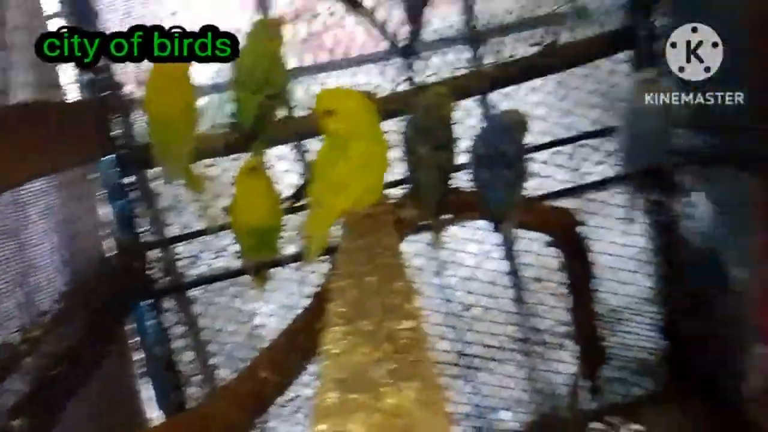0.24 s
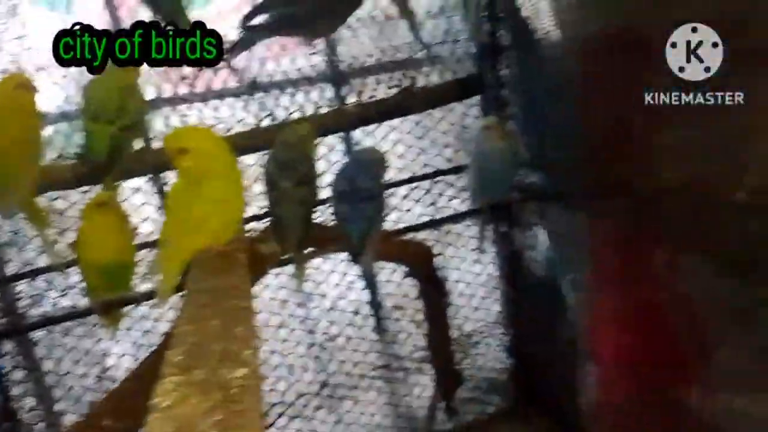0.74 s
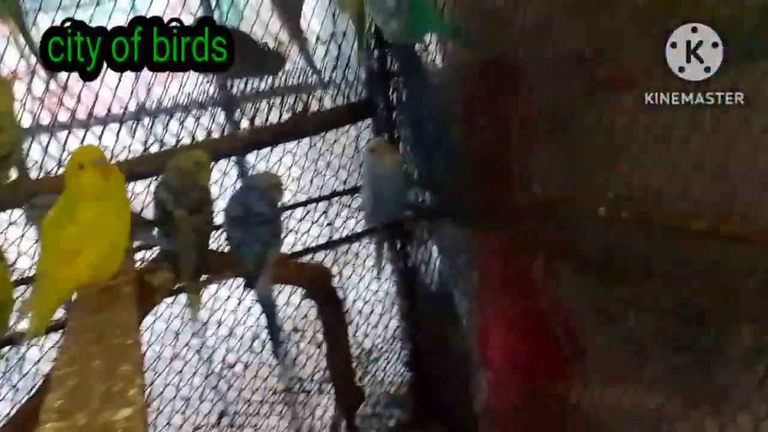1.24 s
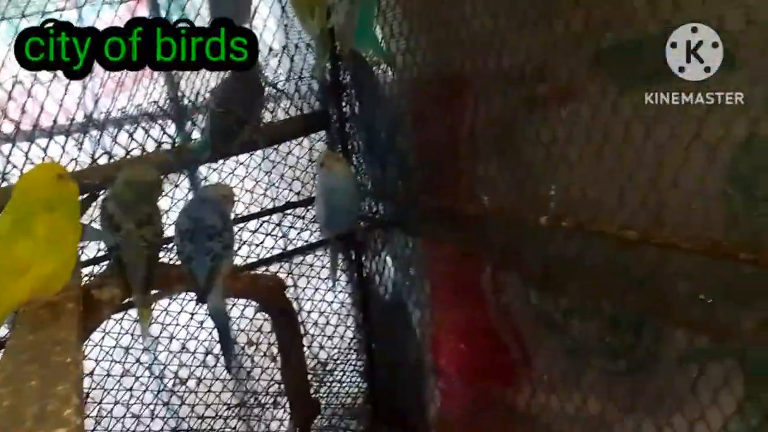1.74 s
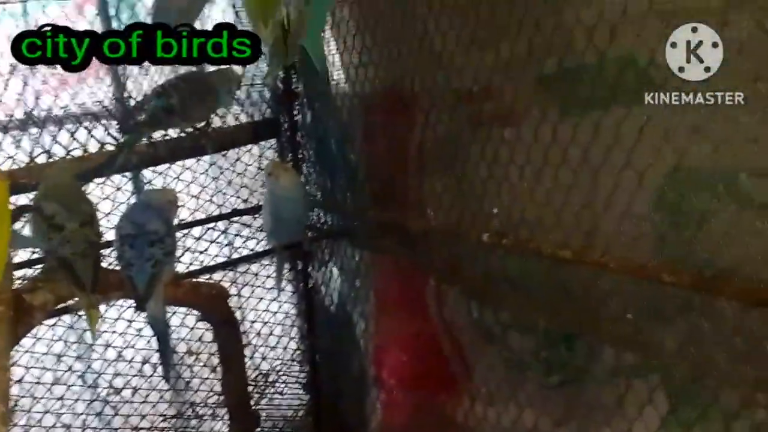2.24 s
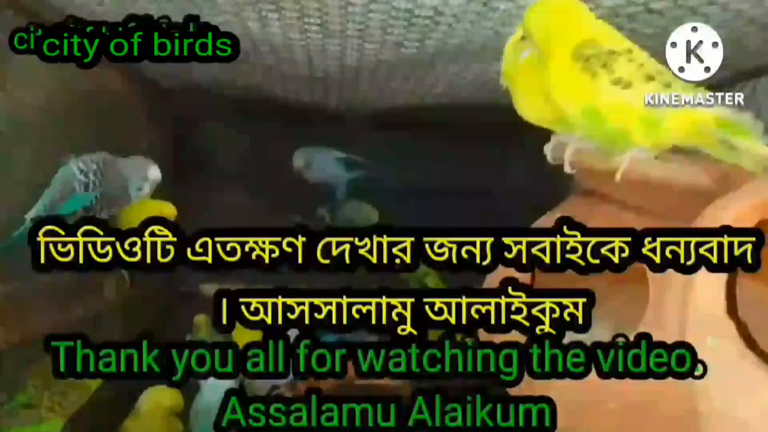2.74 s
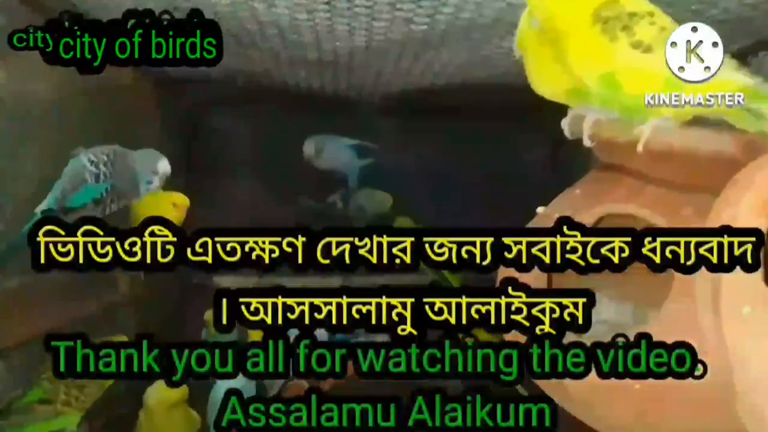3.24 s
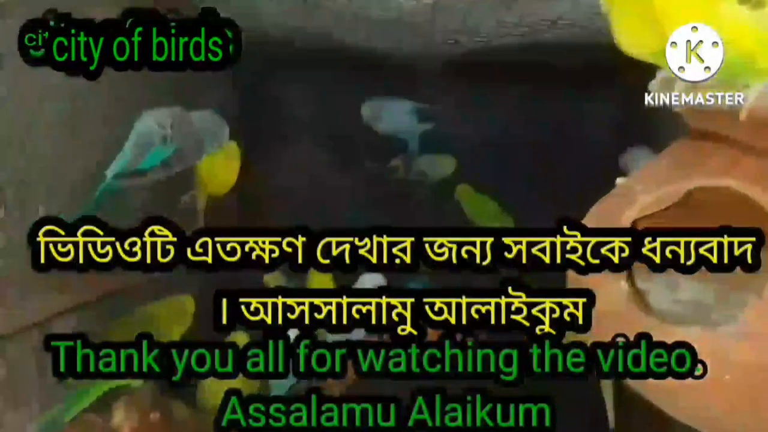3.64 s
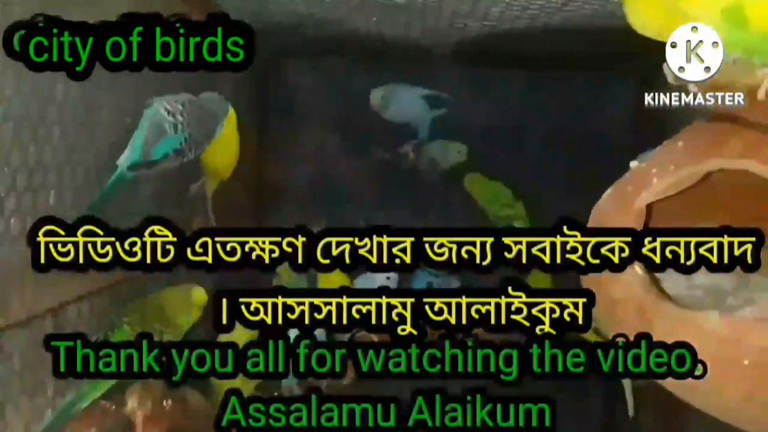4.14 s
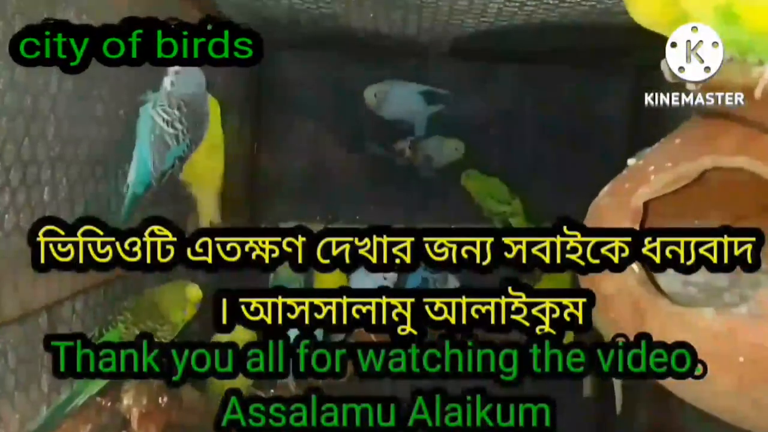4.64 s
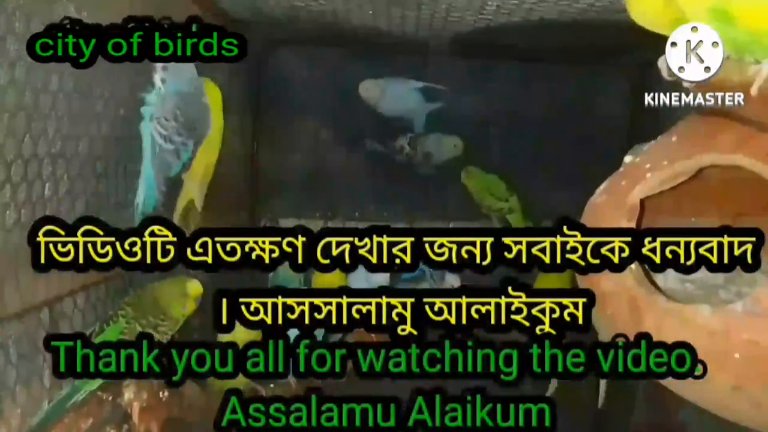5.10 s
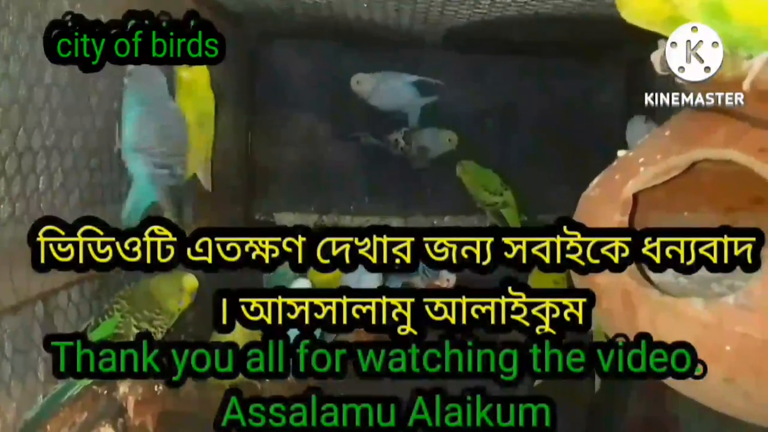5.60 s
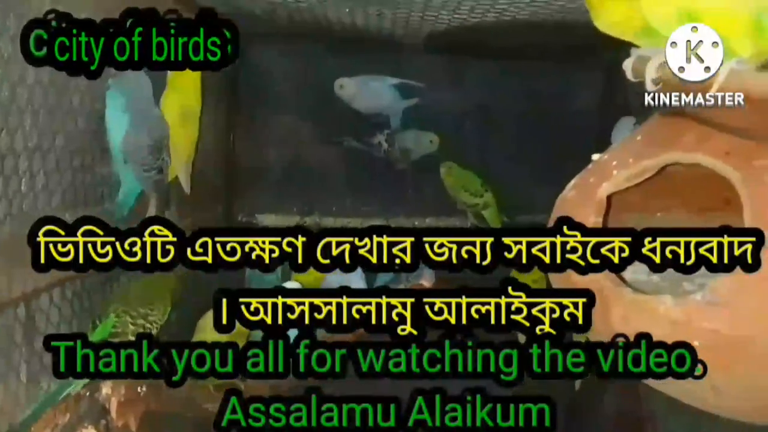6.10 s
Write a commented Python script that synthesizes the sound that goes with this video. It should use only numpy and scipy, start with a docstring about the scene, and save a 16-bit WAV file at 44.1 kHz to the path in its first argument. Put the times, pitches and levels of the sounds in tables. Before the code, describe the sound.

Small caged parrots call sharply, then warble and chatter close by over a thin, shrill hiss.

```python
"""Small parrots in a wire cage

One parrot repeats a loud flight call while others warble, chuckle, trill and rasp, close to a phone.
Each whistle is a fast-gliding tone from the syrinx, a bird's voice box; a rasp is noise chopped by
its uneven flapping. The cage and a hard-walled yard echo, over a far rumble, a hum and a shrill hiss."""
import sys
import numpy as np
from scipy import signal
from scipy.fft import rfft, irfft, next_fast_len
from scipy.io import wavfile
from scipy.ndimage import uniform_filter1d, minimum_filter1d, map_coordinates

SR = 44100
rng = np.random.default_rng(int(sys.argv[2]) if len(sys.argv) > 2 else 0)


def write(x):
    x = np.atleast_2d(x).T
    wavfile.write(sys.argv[1], SR, np.round(np.clip(x, -1, 1) * 32767).astype(np.int16))


N = 280476
TOP_HZ = 15700  # the highest sound the phone keeps
EDGE_S = .003  # fade at each end of a whistle


def amp(db):
    """Turns decibels into a volume multiplier."""
    return 10 ** (np.asarray(db) / 20)


def unit(x):
    """Scales a sound to an average (rms) strength of 1."""
    return x / np.sqrt(np.mean(x ** 2) + 1e-20)


def at_pitch(points, hz):
    """Reads between (pitch_hz, value) rows, spacing octaves evenly."""
    pitches, values = np.transpose(points)
    return np.interp(np.log(hz + 1), np.log(pitches + 1), values)


def over_time(points):
    """Joins (time_s, value) rows into a curve as long as the scene."""
    return np.interp(np.arange(N) / SR, *np.transpose(points))


def wobble(rate_hz, size=N):
    """A smooth curve through rate_hz random values a second."""
    values = rng.standard_normal(int(size * rate_hz / SR) + 4)
    return map_coordinates(values, [np.arange(size) * rate_hz / SR])


def loudness(x):
    """A sound's strength from moment to moment."""
    return np.sqrt(np.abs(uniform_filter1d(x ** 2, 300)))


def filtered(x, response):
    """Multiplies each frequency in a sound by response(hz)."""
    size = next_fast_len(N + SR // 2)
    return irfft(rfft(x, size) * response(np.fft.rfftfreq(size, 1 / SR)), size)[..., :N]


def rush(spectrum, patchy_db):
    """Noise of strength 1, shaped by a spectrum, with random louder and softer patches."""
    bands = signal.stft(rng.standard_normal(N + 512), nperseg=512)[2]
    patches = uniform_filter1d(uniform_filter1d(rng.standard_normal(bands.shape), 5, 0), 8, 1)
    noise = signal.istft(bands * amp(patchy_db * unit(patches)), nperseg=512)[1][:N]
    return unit(filtered(noise, lambda hz: amp(at_pitch(spectrum, hz))))


def add(track, start_s, sound):
    """Mixes a sound into a track."""
    i = max(round(start_s * SR), 0)
    track[i:i + len(sound)] += sound[:N - i]


# How loud the far traffic is: time_s, level_db
TRAFFIC_LEVELS = [(0, -48.5), (1.2, -49.5), (1.8, -42.5), (2.3, -48), (2.64, -55), (3.1, -38.5),
                  (3.7, -43.5), (4.9, -40), (5.8, -42.5), (6.36, -41.5)]
# How loud the hum and hiss are: time_s, hum_db, shrill_db
BACKGROUND_LEVELS = [(0, -41.5, -43.5), (.45, -40, -39.5), (.8, -41, -45), (1.5, -40.5, -41),
                     (2.2, -41, -44), (2.76, -42, -41.5), (2.85, -34.5, -35.5), (3.01, -31, -31.5),
                     (3.72, -31.5, -32), (4.11, -39, -44), (4.41, -37, -38), (4.85, -39.5, -40.5),
                     (5.2, -35, -39), (5.6, -43, -44), (6.02, -32.5, -32.5), (6.36, -32.5, -31)]
# The tone color of each background noise: pitch_hz, relative_db
RUMBLE_SPECTRUM = [(15, -24.5), (25, 1), (27, -8), (32, -15.5), (65, -8), (139, -16), (188, -9.5),
                   (450, -22), (580, -46), (990, -120)]
HUM_SPECTRUM = [(240, -50), (400, -16), (605, -11), (828, -19.5), (1290, -0.5), (1520, -13), (1930, -12.5),
                (2220, -16.5), (2470, -35), (3070, -18), (3920, -28), (4200, -22), (5460, -57.5),
                (9240, -120)]
SHRILL_SPECTRUM = [(2350, -51.5), (4000, -36), (4510, -3), (4800, 2), (5130, -5), (5400, -21.5),
                   (6160, -20), (9470, -37), (10400, -40.5), (10900, -54), (14300, -47), (15500, -55.5)]

def surroundings():
    """Far traffic, an outdoor hum near 1.3 kHz and a shrill, insect-like hiss near 5 kHz."""
    levels = np.array(BACKGROUND_LEVELS)
    hum_db, shrill_db = over_time(levels[:, [0, 1]]), over_time(levels[:, [0, 2]])
    rumble = amp(over_time(TRAFFIC_LEVELS)) * rush(RUMBLE_SPECTRUM, patchy_db=2)
    hum = amp(hum_db + 1.38 * wobble(90)) * rush(HUM_SPECTRUM, patchy_db=2)
    shrill = amp(shrill_db + 1.1 * wobble(200)) * rush(SHRILL_SPECTRUM, patchy_db=2)
    return rumble + hum + shrill


# The yard's echo, and how long it takes to fall 60 dB: pitch_hz, fade_s, echo_db
YARD_ECHO = [(1000, .15, -16), (2100, .13, -18), (2500, .15, -17), (3200, .4, -14), (4200, .3, -14),
             (5300, .55, -9), (7000, .55, -8), (8000, .3, -12), (12000, .2, -14)]

def yard(x):
    """Hard walls scatter echoes; each pitch dies at its own speed, and the scatter changes as birds move."""
    out, step, table = np.zeros(N), SR // 7, np.array(YARD_ECHO)
    for i in range(0, N, step):
        hz, t, bands = signal.stft(rng.standard_normal(SR // 2), SR, nperseg=256)
        decay = amp(-60 * t / at_pitch(table[:, :2], hz)[:, None])
        decay /= np.linalg.norm(decay, axis=1, keepdims=True)
        tail = signal.istft(bands * decay, SR, nperseg=256)[1]
        add(out, i / SR + .0087, signal.fftconvolve(x[i:i + step], tail / np.linalg.norm(tail)))
    return filtered(out, lambda hz: amp(at_pitch(table[:, ::2], hz)))


# Bounces off the cage: delay_s, level_db
CAGE_ECHOES = [(.0037, -19), (.0061, -19), (.0098, -20), (.0143, -21), (.021, -22)]

def cage(x):
    """The sides of the cage send back a few quick, quiet copies."""
    return sum(amp(db) * np.pad(x, (round(delay * SR), 0))[:N] for delay, db in CAGE_ECHOES)


# Narrow gaps in the sound from all around: pitch_hz, width_hz, depth_share
PITCH_DIPS = [(2530, 100, 0.3), (3860, 93, 0.5), (7700, 190, 1)]

def pitch_dips(hz):
    """How much of each frequency is left after the dips."""
    return np.prod([1 - depth / (1 + (2 * (hz - center) / width) ** 2)
                    for center, width, depth in PITCH_DIPS], axis=0)


# Boost or cut above 9.5 kHz: time_s, gain_db
TREBLE_LEVELS = [(0, 1), (2.65, 12), (2.75, -20), (4.73, -25), (4.76, 2.5), (5.15, -7.5), (5.35, 2.5),
                 (5.55, 0.5), (6.36, -22)]

def shifting_treble(x):
    """The flock's highest sounds come and go."""
    treble = filtered(x, lambda hz: 1 / (1 + (9500 / (hz + 1)) ** 16))
    return x - treble * (1 - amp(over_time(TREBLE_LEVELS)))


# Where a bird's throat rings: pitch_hz, width_hz, weight_db
HIGH_RINGS = [(6400, 1360, 4.5), (4860, 1080, 0.5), (8030, 500, -20)]
LOW_RINGS = [(3660, 1800, 23.5), (1660, 6000, 12.5)]

def throat(flaps, rings):
    """Chopped noise rings in the throat, passing twice through the same filter."""
    def response(hz):
        return sum((-1) ** k * amp(db) * 1j * hz * width / (center ** 2 - hz ** 2 + 1j * hz * width)
                   for k, (center, width, db) in enumerate(rings))
    return unit(filtered(flaps * rng.standard_normal(N), lambda hz: response(hz) ** 2))


# The tone color of a low, noisy puff: pitch_hz, relative_db
PUFF_SPECTRUM = [(30, -2), (300, -2), (900, -6), (1600, -10), (2500, -6.5), (6000, -30.5), (8000, -39),
                 (13000, -34.5), (16000, -34.5)]
# Harsh bursts: start_s, length_s, level_db, low_throat_relative_db, puff_relative_db
RASP_BURSTS = [(0.14, 0.027, -27, -2, -15.5), (0.169, 0.034, -27.5, -2, -20.5),
               (0.206, 0.033, -30, 2.5, -21.5), (0.243, 0.024, -26.5, -1.5, -15.5),
               (0.266, 0.035, -30.5, 1.5, -9.5), (0.301, 0.03, -26.5, -4.5, -21.5),
               (0.38, 0.042, -30, -3, -10), (0.4, 0.067, -36.5, -12, -14.5), (2.579, 0.03, -27.5, -5, -9),
               (3, .045, -57, 20, 8), (3.633, 0.0095, -24.5, 1.5, -24.5), (4.176, 0.062, -38, 14, -8),
               (4.678, 0.027, -36, -12, -24), (4.761, 0.024, -49.5, 26.5, 16.5),
               (4.853, 0.034, -34.5, 1.5, -9.5), (5.208, 0.039, -35.5, 9.5, -9),
               (5.234, 0.079, -30, -6.5, -14), (5.339, 0.092, -44.5, 25, 10.5),
               (6.226, 0.019, -39, 15.5, -14), (6.277, 0.018, -48.5, 27.5, 4)]

def rasps():
    """Uneven flaps of the syrinx chop noise into a rasp; each flight call also opens with one."""
    high, low, puff = np.zeros((3, N))
    openers = [(start + .00082, .026, db - 27, -14, -10) for start, db, *_ in FLIGHT_CALLS]
    for start, length, db, low_db, puff_db in RASP_BURSTS + openers:
        progress = np.arange(round(length * SR)) / (length * SR)
        swell = amp(db) * np.clip(progress * 12, 0, 1) * np.clip((1 - progress) * 3, 0, 1)
        add(high, start, swell)
        add(low, start, swell * amp(low_db))
        add(puff, start, swell * amp(puff_db))
    flaps = amp(3.7 * wobble(250))
    ringing = high * throat(flaps, HIGH_RINGS) + low * throat(flaps, LOW_RINGS)
    return ringing + puff * unit(flaps * rush(PUFF_SPECTRUM, patchy_db=1.5))


# Fainter tones above a high whistle sung at -12 dB: pitch_multiple, relative_db
WHISTLE_OVERTONES = [(2, -33.5), (3, -38.5), (4, -47), (5, -46)]

def whistle(note, flutter_db, waver, rough):
    """The syrinx glides through (time_s, pitch_hz, level_db) rows; low or quiet notes are purer."""
    times, hz, db = np.transpose(note)
    t = np.arange(times[0] - EDGE_S, times[-1] + EDGE_S, 1 / SR)
    pitch, level = (uniform_filter1d(np.interp(t, times, v), 90, mode="nearest") for v in (hz, db))
    phase = 2 * np.pi * np.cumsum(pitch * (1 + waver * wobble(300.5, len(t)))) / SR
    richness = amp(.7 * (np.minimum(level, -9) + 12)) * np.minimum(pitch / 2900, 1) ** 4
    overtones = sum(amp(gain_db) * np.sin(k * phase) * (k * pitch < TOP_HZ)
                    for k, gain_db in WHISTLE_OVERTONES)
    tone = np.sin(phase) + richness * overtones
    buzz = 1 + rough * wobble(1393, len(t))  # fast shaking makes the tone raspy
    fade = np.clip(np.minimum(t - t[0], t[-1] - t) / EDGE_S, 0, 1) ** 2
    return np.sqrt(2) * tone * buzz * fade * amp(level + flutter_db * wobble(251.5, len(t)))


# The flock's quick notes: start_s, length_s, first_hz, loudest_hz, last_hz, peak_db, peak_at_share
WARBLE_NOTES = [ (0, .021, 3300, 2945, 3090, -5, 0.36), (0.024, 0.019, 2950, 2870, 2837, -11.5, 0.36),
                (.043, 0.023, 2840, 2810, 2720, -17.5, 0.45), (0.073, 0.026, 2740, 2724, 2780, -20, 0.24),
                (0.388, .009, 3320, 6350, 7470, -23, 0.42), (0.395, .014, 7500, 6300, 4370, -21, .4),
                (2.571, 0.027, 6450, 6010, 5960, -30, 0.44), (2.579, 0.011, 1110, 1260, 1470, -24.5, 0.61),
                (2.809, 0.039, 2600, 2800, 2700, -39.5, 0.53), (2.844, 0.044, 2530, 2605, 2970, -32, 0.35),
                (2.879, .016, 2920, 2920, 3390, -27.5, 0.34), (2.939, 0.064, 2350, 2320, 2290, -33, 0.61),
                (3.004, .018, 2570, 3000, 2680, -29, 0.53), (3.014, 0.031, 1890, 2100, 2360, -26.5, 0.52),
                (4.346, 0.032, 8760, 8480, 7600, -37, 0.43), (3.133, .04, 3800, 2430, 2840, -27, 0.58),
                (3.783, .016, 3900, 3690, 3430, -24, 0.43), (3.797, .015, 3500, 3660, 3650, -20.5, .6),
                (3.788, 0.019, 2110, 1990, 1900, -30.5, 0.54), (3.814, .033, 3250, 3024, 2490, -16.5, 0.47),
                (3.849, 0.024, 2620, 2200, 2150, -17.5, 0.55), (3.885, 0.02, 2270, 2290, 2300, -26, 1),
                (3.862, 0.025, 3120, 3260, 3300, -21.5, 0.82),
                (3.891, 0.0056, 3200, 3030, 3100, -21.5, 0.43), (3.871, 0.023, 4210, 4220, 4230, -21.5, .7),
                (3.915, .02, 5680, 5910, 6670, -22, 0.24), (3.924, 0.068, 6600, 6460, 6680, -31.5, 0.067),
                (3.943, .022, 2376, 2024, 1850, -16, 0.6), (3.975, .013, 3120, 3150, 3050, -31, .5),
                (3.987, .018, 4060, 3150, 2300, -17, 0.75), (4.006, .018, 2200, 2044, 2210, -15, 0.66),
                (4.018, .036, 3370, 3110, 2740, -12.5, 0.51), (4.045, 0.035, 3206, 3115, 3100, -13, 0.61),
                (4.048, 0.017, 3460, 3660, 3340, -13, 0.45), (4.06, 0.014, 2975, 2733, 2960, -9, 0.29),
                (4.066, 0.04, 2953, 2910, 3130, -12.5, 0.61), (4.048, .014, 7360, 7420, 7100, -33.5, .4),
                (4.084, 0.026, 6000, 5940, 5920, -42.5, .5), (4.105, 0.021, 2680, 2310, 2600, -12.5, 0.19),
                (4.124, .02, 2440, 2930, 3680, -16, 0.46), (4.137, .017, 3376, 3510, 3300, -10, .7),
                (4.153, 0.0068, 3310, 3310, 3420, -10, 0.61), (4.167, .015, 2220, 2080, 2020, -15.5, 0.73),
                (4.176, .015, 8800, 8550, 8300, -31.5, 0.36), (4.206, 0.019, 1953, 2070, 2210, -9.5, 0.51),
                (4.218, .03, 2194, 2274, 2050, -11.5, 0.63), (4.219, 0.0428, 2950, 2700, 2680, -9, 0.81),
                (4.26, .03, 2825, 2755, 2666, -7.5, 0.36), (4.289, 0.0352, 2626, 3090, 3480, -12.5, 0.39),
                (4.307, 0.0464, 3366, 3255, 3170, -9.5, 0.78), (4.227, .023, 8600, 8400, 8100, -32, 0.62),
                (4.244, .055, 4200, 4600, 4770, -27.5, 0.69), (4.268, 0.011, 3540, 3280, 3200, -12.5, 0.57),
                (4.256, 0.029, 2410, 2460, 2320, -16, 0.38), (4.257, 0.017, 4140, 4180, 4280, -21.5, 0.68),
                (4.263, .015, 4210, 3390, 2700, -11, 0.45), (4.28, 0.018, 8100, 7940, 7900, -41, 0.44),
                (4.283, 0.014, 3430, 3650, 3800, -14, 0.51), (4.324, 0.014, 1880, 2660, 1680, -17, 0.43),
                (4.341, 0.036, 2880, 2894, 2680, -13, 0.46), (4.369, 0.028, 2750, 2500, 2510, -18.5, 0.36),
                (4.358, 0.011, 1710, 1720, 1730, -22, 0.43), (4.366, 0.011, 3510, 3590, 3600, -23, .5),
                (4.394, 0.035, 1940, 1906, 1890, -27.5, 0.56), (4.395, 0.0224, 2890, 3420, 3550, -29, 0.39),
                (4.412, .012, 1500, 1350, 1250, -25, 0.58), (4.437, 0.018, 1540, 1620, 1650, -28, 0.58),
                (4.438, 0.027, 3110, 3200, 2910, -19.5, 0.3), (4.461, 0.035, 1350, 1330, 1440, -28.5, 0.55),
                (4.493, .03, 1890, 2010, 1960, -25, 0.7), (4.506, 0.0312, 1558, 1415, 1190, -24.5, 0.43),
                (4.516, 0.027, 2870, 3120, 3250, -29, .75), (4.539, .036, 1504, 1737, 2140, -23, 0.39),
                (4.578, .027, 2480, 2510, 2320, -26.5, .5), (4.604, 0.02, 2890, 2740, 2600, -31, 0.47),
                (4.607, 0.066, 6810, 6760, 6300, -28, 0.5), (4.664, .034, 6360, 6420, 5880, -26, 0.37),
                (4.625, .024, 2510, 3080, 1770, -29, 0.5), (4.649, .02, 7330, 7060, 7200, -28.5, 0.57),
                (4.757, 0.015, 2717, 4190, 4000, -22, 0.55), (4.816, .015, 3400, 3340, 3300, -18.5, 0.37),
                (4.951, 0.013, 3430, 3700, 3570, -18.5, 0.65), (4.998, 0.014, 2776, 2790, 2700, -16.5, .5),
                (5.081, 0.037, 2794, 3000, 2820, -13.5, 0.74), (5.115, 0.025, 2930, 2820, 2950, -14.5, 1),
                (5.101, 0.0342, 1680, 2080, 1823, -7.5, 0.41), (5.12, .021, 3680, 3495, 3640, -14, .45),
                (5.137, 0.021, 2460, 2466, 2370, -15, .45), (5.14, 0.038, 1143, 1157, 1150, -34.5, .3),
                (5.141, 0.012, 3280, 3200, 3150, -22, .6), (5.147, 0.036, 2920, 2790, 2170, -13, .6),
                (5.168, 0.02, 3620, 3600, 3720, -27, .3), (5.194, 0.012, 2870, 3280, 3500, -17, 0.89),
                (5.205, .035, 5990, 5460, 4850, -27.5, .4), (5.206, 0.026, 7300, 6200, 5930, -25.5, 0.88),
                (5.236, 0.016, 6090, 6130, 6760, -16.5, 0.45), (5.222, 0.018, 1147, 1240, 1100, -25, 0.37),
                (5.243, .024, 1080, 1167, 1300, -25.5, .5), (5.273, 0.051, 1180, 1390, 1590, -33, 0.48),
                (5.291, 0.032, 3420, 4170, 4500, -10.5, 0.44),
                (5.295, 0.027, 3190, 2990, 2330, -20.5, 0.39), (5.32, .018, 2110, 2160, 2280, -21.5, 0.6),
                (5.321, 0.02, 5220, 4840, 4800, -15.5, 0.27), (5.333, .024, 2820, 2970, 3380, -13.5, 0.34),
                (5.35, 0.013, 3410, 4720, 4440, -20, .4), (5.352, 0.043, 3600, 3530, 3360, -11, 0.25),
                (5.347, .019, 4230, 3860, 3900, -11, .75), (5.373, .025, 3340, 3080, 3080, -9.5, 0.52),
                (5.376, .012, 3560, 3270, 3380, -10, 0.38), (5.387, 0.023, 3104, 2890, 2700, -8, 0.26),
                (5.391, 0.018, 3350, 4700, 3640, -15.5, 0.52), (5.393, 0.02, 8660, 8130, 8270, -30.5, .5),
                (5.407, 0.028, 3720, 3210, 3700, -11.5, 0.48), (5.432, .027, 3480, 4250, 4140, -19, .4),
                (5.405, 0.013, 2740, 2890, 2820, -9, .4), (5.411, 0.034, 2506, 2395, 2430, -15.5, 0.87),
                (5.437, .014, 3460, 3600, 3840, -14, 0.34), (5.449, 0.022, 3890, 3350, 3230, -16.5, 0.54),
                (5.452, 0.02, 3920, 4090, 4000, -12, 0.65), (5.455, 0.0237, 8300, 8150, 7600, -36, 0.42),
                (5.52, 0.0135, 2720, 2150, 1930, -29, 0.88), (5.537, .042, 3120, 2480, 2100, -29.5, 0.41),
                (5.572, 0.032, 8340, 8070, 7700, -34, 0.35), (6.117, 0.026, 3680, 3540, 3380, -29.5, 0.32),
                (6.139, .017, 3400, 2990, 2800, -24.5, 0.69), (6.161, 0.017, 2810, 2750, 3080, -19, 0.41),
                (6.171, 0.012, 2650, 2690, 2890, -18, .5), (6.181, 0.011, 3330, 3600, 3370, -14, 0.36),
                (6.187, .012, 3120, 3070, 3210, -20, .25), (6.199, 0.011, 2630, 2650, 2670, -18, 0.71),
                (6.195, 0.02, 2090, 2110, 2020, -25.5, .2), (6.228, 0.015, 3570, 3590, 3320, -19, 0.49),
                (6.23, 0.02, 8160, 8200, 7900, -32.5, 0.46), (6.249, 0.036, 2450, 2100, 2410, -21.5, 0.28),
                (6.247, .021, 5170, 5350, 5250, -27, 0.41), (6.269, .019, 4330, 4130, 3960, -23.5, 0.72),
                (6.276, 0.013, 3866, 3695, 3720, -16, 0.48), (6.283, 0.027, 3540, 3070, 3270, -18, .6),
                (6.278, 0.0099, 7540, 7520, 7300, -30, 0.54), (6.29, .015, 3055, 3240, 3450, -15, 0.53),
                (6.293, 0.016, 6540, 6630, 6640, -34, .4), (6.306, 0.034, 8470, 8260, 8070, -31.5, 0.6),
                (6.304, .018, 2770, 2910, 2670, -4.5, 0.83), (6.324, .016, 2650, 2725, 2760, -16, 0.44),
                (6.333, 0.022, 2550, 2520, 2430, -13.5, .4), (6.348, 0.019, 3080, 2950, 2860, -13, 0.84)]
# The tone color of the air in those notes: pitch_hz, relative_db
WARBLE_AIR = [(200, -9), (1500, 2.5), (3500, 6.5), (6000, -11), (8500, -7), (10500, -44), (15500, -32)]
# One low chuckle: after_start_s, pitch_hz, level_db
CHUCKLE_SHAPE = [(0, 1150, -30), (.005, 1400, -19), (.008, 1700, -24), (.012, 2050, -11), (.017, 1900, -16),
                 (.019, 1600, -26), (.023, 1450, -16), (.032, 1420, -28)]
# Each chuckle: start_s, gain_db
CHUCKLE_TIMES = [(2.331, 1), (2.411, 1.5), (2.491, 1)]

def warble():
    """The flock whistles airy notes that glide through three pitches, and a few low chuckles."""
    out = np.zeros(N)
    rise_db, fade_db, halfway_share = 9.5, 7.5, .36
    below_peak_db = np.array([rise_db, halfway_share * rise_db, 0, halfway_share * fade_db, fade_db])
    for start, length, first, loudest, last, db, peak_at in WARBLE_NOTES:
        peak_at = np.clip(peak_at, .05, .95)
        times = start + length * np.array([0, peak_at / 2, peak_at, (1 + peak_at) / 2, 1])
        pitch = np.interp(times, times[::2], [first, loudest, last])
        note = np.transpose([times, pitch, db - below_peak_db])
        add(out, start - EDGE_S, whistle(note, flutter_db=2.5, waver=.012, rough=.2))
    air = loudness(out) * rush(WARBLE_AIR, patchy_db=3)
    for start, db in CHUCKLE_TIMES:
        note = np.array(CHUCKLE_SHAPE) + [start, 0, db]
        add(out, start - EDGE_S, whistle(note, flutter_db=.6, waver=.005, rough=.03))
    return out + amp(-21.5) * air


# A near bird's held notes: start_s, length_s, first_hz, middle_hz, last_hz, level_db
HELD_NOTES = [(4.765, .044, 4183, 3576, 3360, -14), (4.963, .033, 3140, 2990, 2860, -13),
              (5.052, .032, 1867, 2133, 1860, -9)]

def held_notes():
    """Even, pressed whistles that start softly and stop at once."""
    out = np.zeros(N)
    for start, length, first, middle, last, db in HELD_NOTES:
        note = [(start, first, db - 6), (start + .15 * length, first, db),
                (start + length / 2, middle, db), (start + length, last, db)]
        tone = whistle(note, flutter_db=1, waver=.0048, rough=.03)
        pressed = tone - amp(-30 - 2 * db) * tone ** 3  # flatter wave tops add odd overtones
        add(out, start - EDGE_S, pressed)
    return out


# Trills on one pitch: start_s, beat_count, gap_s, loudest_at_s, peak_db, loss_per_beat_db, pitch_hz
TRILLS = [(.452, 8, .0123, 0.518, -1, 3, 2198), (1.319, 4, 0.012, 1.325, -26, 0.5, 2180)]

def trills():
    """Short, slightly uneven beats of one tone, about eighty a second, swell and fade."""
    out = np.zeros(N)
    for start, beats, gap, loudest_at, peak_db, loss_db, pitch in TRILLS:
        for k, (later, softer_db, sharper) in enumerate(rng.standard_normal((beats, 3))):
            when = start + k * gap + .0004 * later
            db = peak_db - loss_db * abs(when - loudest_at) / gap - softer_db
            hz = pitch * (1 + .015 * sharper)
            beat = [(when - .004, hz, db - 10), (when, hz, db), (when + .004, hz, db - 12)]
            add(out, when - .004 - EDGE_S, whistle(beat, flutter_db=.3, waver=.015, rough=.11))
    return out


# The three parts of a flight call: after_start_s, pitch_hz, level_db
CALL_FALL = [(-.025, 7630, -61.5), (0, 8120, -40), (.005, 6200, -26), (.009, 4000, -31.5)]
CALL_HOLD = [(.01, 4000, -30), (.014, 3400, -19), (.022, 3170, -11), (.03, 3270, -6), (.037, 3360, -3),
             (.044, 3460, -3), (.051, 3200, -3), (.055, 2930, -4), (.058, 3000, -12), (.063, 3100, -19)]
CALL_DROP = [(.056, 2900, -25), (.062, 2450, -25), (.066, 2200, -17), (.069, 2140, -13), (.073, 2130, -20)]
# Each call: start_s, gain_db, pitch_factor, length_factor, drop_gain_db
FLIGHT_CALLS = [(.609, -0.5, .99, 1, 0), (0.754, -0.5, 0.99, 1.034, -1), (.904, -1, 0.99, 0.98, 0.5),
                (1.053, -1, 1.005, 1, 1), (1.195, 0, 1, 1.03, -6.5), (1.341, -2, 1.004, 0.96, 1.5),
                (1.478, -1.5, 1, 1.016, 1), (1.626, -0.5, 1, 1.02, -1.5), (1.764, -1, 1.003, 1.04, -4),
                (1.906, -1.5, 1.003, 1.08, -8.5), (2.049, -0.5, 1.002, 0.95, -10),
                (2.196, -1, 1.014, 1.05, -7.5)]

def flight_calls():
    """One bird repeats a rough, steep fall, a held note and a low drop."""
    out = np.zeros(N)
    for start, db, pitch, length, drop_db in FLIGHT_CALLS:
        parts = (CALL_FALL, db, 1.3), (CALL_HOLD, db, .02), (CALL_DROP, db + drop_db, .15)
        for shape, gain_db, rough in parts:
            note = np.array(shape) * [length, pitch, 1] + [start, 0, gain_db]
            add(out, note[0, 0] - EDGE_S, whistle(note, flutter_db=.8, waver=.005, rough=rough))
    # low puffs of noise as the loud calls overload the phone
    overload = np.minimum(loudness(out), .45) ** 1.42
    return out + amp(-10.5) * overload * rush(PUFF_SPECTRUM, patchy_db=1.5)


def scene():
    """Whistles arrive directly; rasps, echoes and the background come from all around."""
    calls = flight_calls()
    flock = shifting_treble(warble()) + held_notes()
    trilling = trills()
    rasping = shifting_treble(rasps())
    echoes = yard(amp(-4) * calls + flock + amp(-5) * trilling + amp(4) * rasping)
    all_around = rasping + cage(flock + rasping) + echoes + surroundings()
    return (calls + flock + trilling + filtered(all_around, pitch_dips))[None]


# The tallest wave the phone allows, low at first: time_s, amplitude
PEAK_CEILING = [(2.25, 0.4), (2.4, 0.76)]
# The signal's resting value, a little above zero: time_s, amplitude
RESTING_VALUE = [(2.7, .032), (2.9, .059)]

def record(dry):
    """The phone quickly turns down loud peaks, cuts the highest treble and rests a little above zero."""
    needed_gain = np.minimum(1, over_time(PEAK_CEILING) / (np.abs(dry) + 1e-9))
    smooth_gain = uniform_filter1d(minimum_filter1d(needed_gain, size=160), size=120)
    return filtered(dry * smooth_gain, lambda hz: hz < TOP_HZ) + over_time(RESTING_VALUE)


dry = scene()
out = record(dry)
write(out)
```